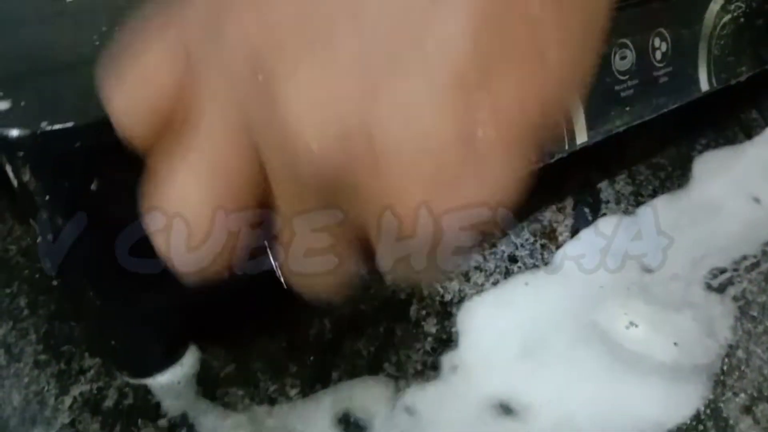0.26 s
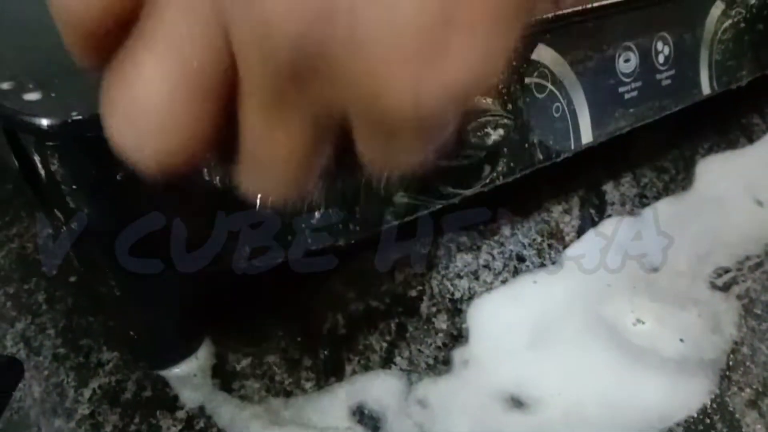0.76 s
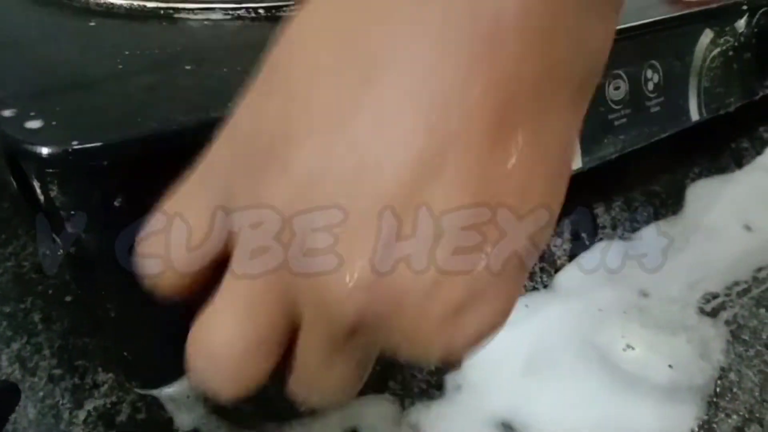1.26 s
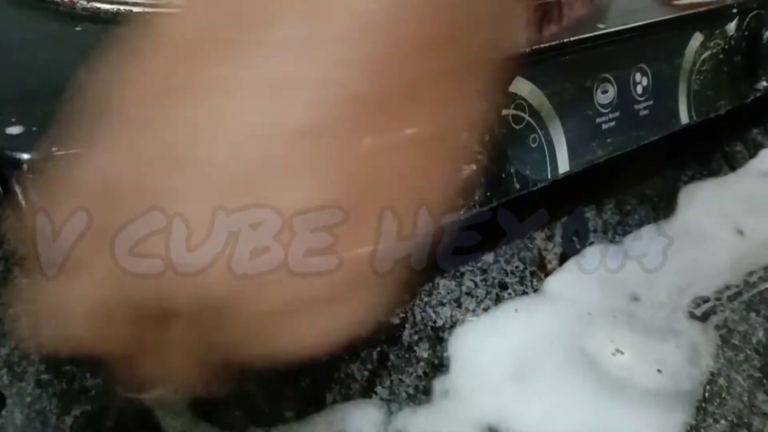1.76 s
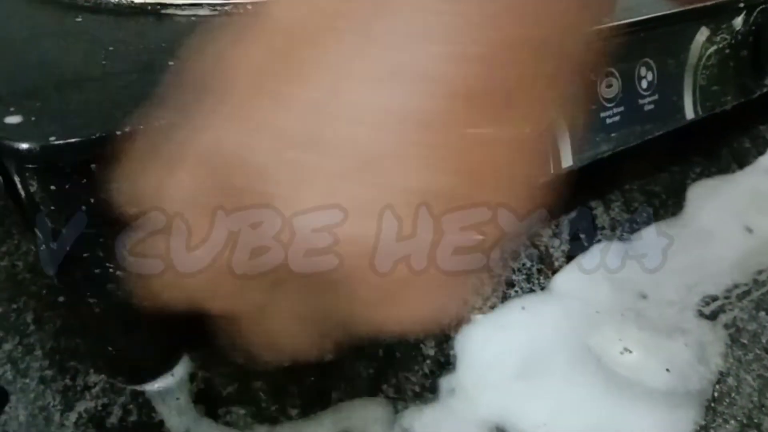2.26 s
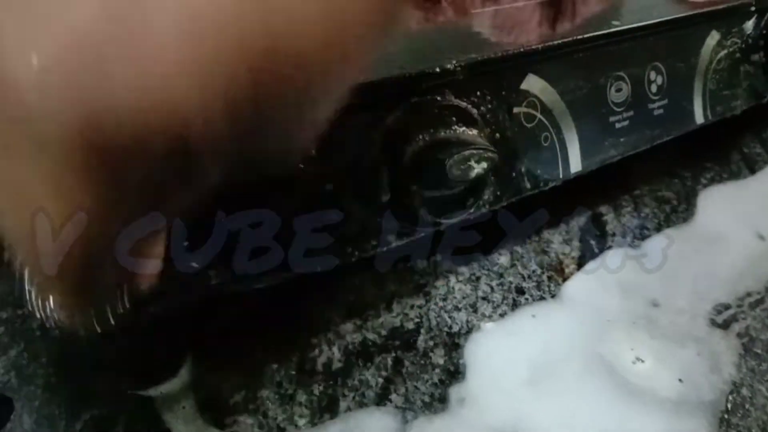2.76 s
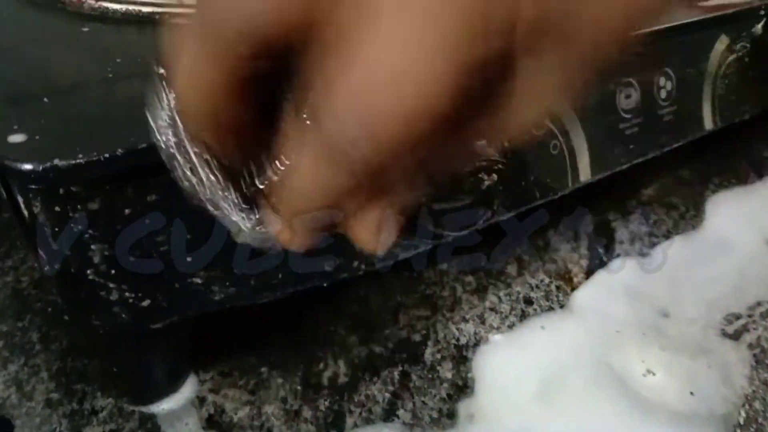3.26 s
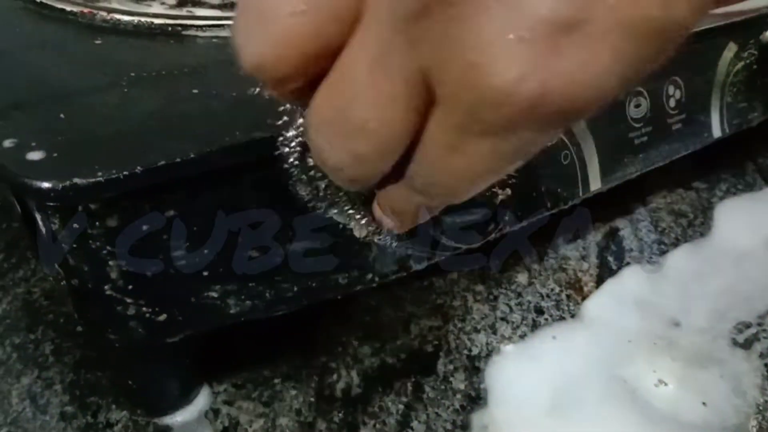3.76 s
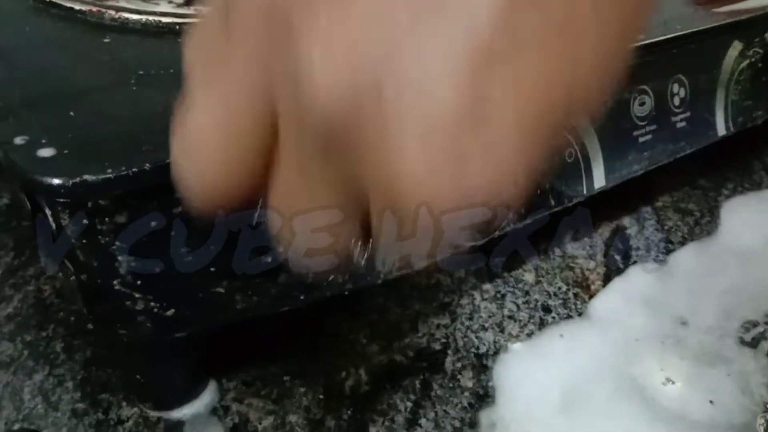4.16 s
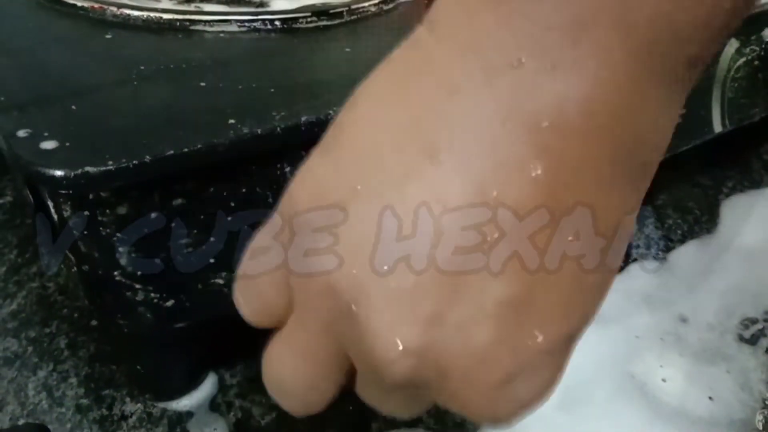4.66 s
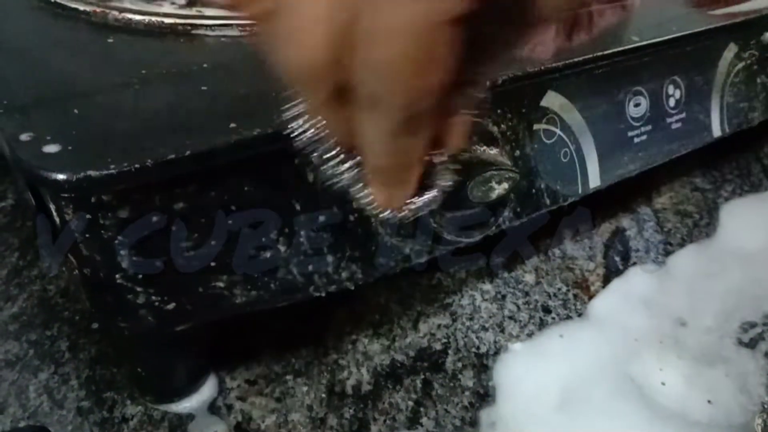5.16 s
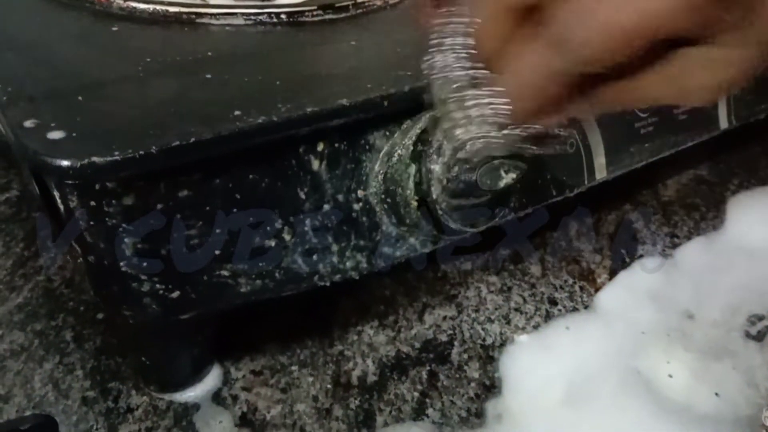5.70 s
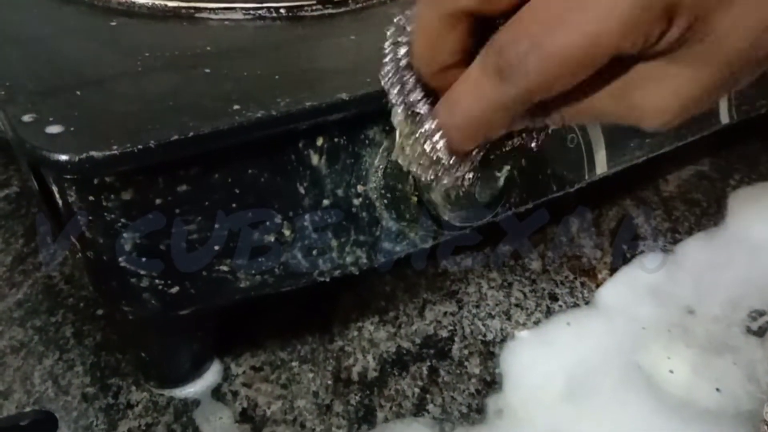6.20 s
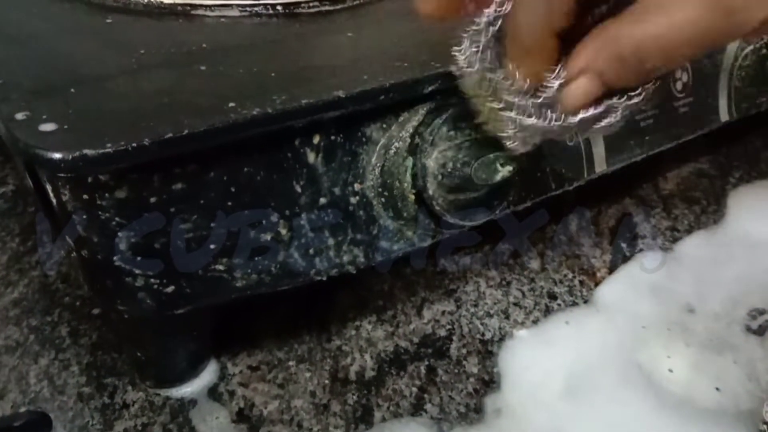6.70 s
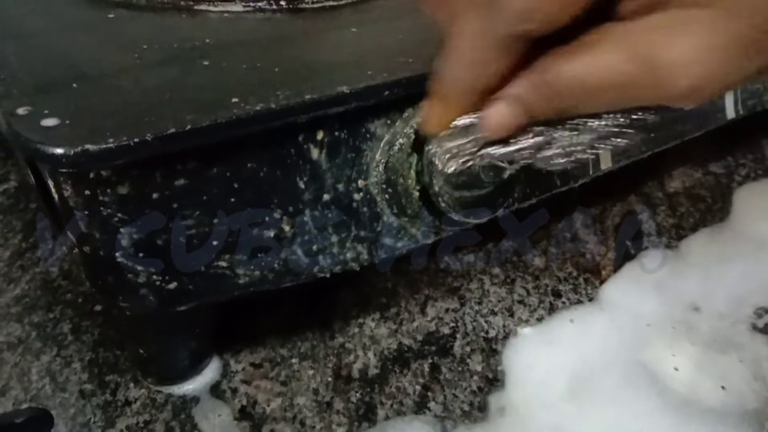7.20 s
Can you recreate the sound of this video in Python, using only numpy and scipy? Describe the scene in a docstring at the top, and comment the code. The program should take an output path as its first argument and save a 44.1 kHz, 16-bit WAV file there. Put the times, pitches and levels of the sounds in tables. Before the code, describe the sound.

A steel wool pad scrubs the front of a gas stove in quick, uneven strokes, a bright, wiry hiss with faint ringing from the sheet metal. The hand knocks the hollow knob a few times early on. The scrubbing pauses briefly and resumes, and later the knob snaps with one hard click, followed by lighter knocks and more strokes. The microphone is close, in a small, quiet kitchen.

```python
"""Steel wool on a gas stove

A steel wool pad scrubs to and fro over the front of a stove, close to a mono phone in a small kitchen.
By stick-slip friction, thousands of wires hiss and ring the sheet panel, its trim, the dial rim and the
hollow knob. The hand knocks these parts and the knob snaps once; the stove body thrums under pressure,
and the room reverberates over a faint noise floor."""
import sys
import numpy as np
from scipy import signal
from scipy.fft import rfft, irfft
from scipy.io import wavfile
from scipy.ndimage import uniform_filter1d

SR = 44100
rng = np.random.default_rng(int(sys.argv[2]) if len(sys.argv) > 2 else 0)


def output_pcm(signal):
    """Save a mono or channel-first signal as 16-bit PCM at the path in sys.argv[1].

    Samples are clipped to [-1, 1] before scaling.
    """
    pcm = np.clip(np.atleast_2d(signal).T, -1, 1) * 32767
    wavfile.write(sys.argv[1], SR, np.round(pcm).astype(np.int16))


N = 328104


def undb(db):
    """Amplitude ratio of a level in dB."""
    return 10 ** (np.asarray(db) / 20)


def unit(x):
    """Normalisation to rms 1."""
    return x / np.sqrt(np.mean(x ** 2))


def walk(per_s):
    """Slow random modulation: held random levels, smoothed twice, at rms 1."""
    hold = int(SR / per_s)
    steps = np.repeat(rng.standard_normal(N // hold + 1), hold)
    return unit(uniform_filter1d(uniform_filter1d(steps, hold), hold)[:N])


def butter(x, hz, kind, order=4):
    """Butterworth low- or high-pass filter."""
    return signal.sosfilt(signal.butter(order, hz, kind, fs=SR, output="sos"), x)


def colour(x, points, size=1024):
    """Minimum-phase filter through (Hz, dB) points, made by folding the cepstrum."""
    hz, db = np.transpose(points)
    gain = undb(np.interp(np.log(np.linspace(1, SR / 2, size + 1)), np.log(hz), db))
    cepstrum = irfft(np.log(gain))
    cepstrum[1:size] *= 2
    cepstrum[size + 1:] = 0
    return signal.oaconvolve(x, irfft(np.exp(rfft(cepstrum))))[:N]


def ring(x, modes, wander_db=0., damping=1.):
    """Modal superposition at about unit noise gain; a moving contact favours one mode, then another."""
    out, power = 0, 0
    for k, (hz, width, db) in enumerate(modes):
        drive = x * undb(wander_db * (walk(10) + .5 * walk(35))) if wander_db else x
        peak = signal.iirpeak(hz, hz / width / damping / 0.96, SR)
        out = out + (-1) ** k * undb(db) * signal.lfilter(*peak, signal.lfilter(*peak, drive))
        power += undb(db) ** 2 * np.pi * .75 * width * damping / SR
    return out / np.sqrt(power)


def at(table, place):
    """Linear interpolation between the rows of a table of places."""
    return np.array([np.interp(place, np.arange(len(table)), column) for column in np.transpose(table)])


def effort(hiss_gain, span_s=0.29):
    """A moving average of the hiss gain tells how hard the hand is at work."""
    half = int(span_s * SR / 2)
    return np.abs(uniform_filter1d(uniform_filter1d(hiss_gain, half), half))


# The kitchen's background spectrum. Each row: frequency in Hz, relative density in dB.
FLOOR_SPECTRUM = [(18, -46), (30, -18), (119, -18.5), (286, 0.5), (439, -10), (1620, -16.5), (1970, -15),
                  (4870, -44.5), (7640, -13), (12000, -53.5), (15600, -84.5), (22000, -120)]


def noise_floor(level_db=-70):
    """Ambient noise: a faint coloured hiss whose level wavers."""
    return unit(colour(rng.standard_normal(N), FLOOR_SPECTRUM)) * undb(level_db + 2.0 * walk(2.7))


def room(x, t60_s=0.46, gate_s=0.18):
    """Reflections off the counter, then a dull room tail, cut short as if by the phone's noise gate."""
    t = np.arange(SR // 2) / SR
    early = 0.3 * np.exp(-t / 0.0061)
    late = undb(-60 * t / t60_s)
    gate = 1 / (1 + (t / gate_s) ** 8)
    response = rng.standard_normal(len(t)) * (early + late * gate) * (t > .002)
    response /= np.sqrt(np.sum(response ** 2))
    return butter(signal.oaconvolve(x, response)[:N], 5950, "low", order=2)


# Low modes of the stove. Each row: frequency in Hz, nominal width in Hz, relative level in dB.
BODY_MODES = [(180, 44, 0)]
RUMBLE_MODES = [(42, 30, -13), (72, 27, -4.5), (110, 130, -4.5)]
# The hand leans on the stove. Each row: time of the peak in seconds, body level in dB, rumble level in dB.
LEANS = [(.21, -54, -65), (.62, -56.5, -63), (.95, -85, -64), (1.37, -52.5, -67), (1.48, -57, -79),
         (1.64, -69, -87), (1.95, -72, -77), (2.399, -54.5, -68.5), (3.11, -65.5, -76.5),
         (3.34, -62.5, -68.5), (3.6, -55.5, -69), (3.8, -49.5, -67.5), (3.96, -52.5, -68.5),
         (4.25, -60.5, -61.5), (4.6, -66, -74.5), (5.3, -61, -77.5), (5.5, -66, -59.5), (5.6, -51.5, -69),
         (6.03, -55, -62.5), (6.13, -47, -60.5), (6.73, -53.5, -79.5), (6.92, -52.5, -72),
         (7.15, -53.5, -70), (7.23, -79, -72), (7.36, -76, -78)]


def thrum(hiss_gain):
    """Forced vibration: scrubbing shakes the stove's low modes, and each lean of the hand swells them."""
    rise_db_per_s, fall_db_per_s = (208.5, 141), (226, 150)  # each pair: body, rumble
    rest_db, shake_db = (-85.5, -93), (-34, -40.5)
    t = np.arange(0, N, 64) / SR
    peak_s, *peaks_db = np.transpose(LEANS)[:, :, None]
    out, work = 0, effort(hiss_gain)
    for k, modes in enumerate((BODY_MODES, RUMBLE_MODES)):
        drop_db = np.maximum(rise_db_per_s[k] * (peak_s - t), fall_db_per_s[k] * (t - peak_s))
        lean = undb(peaks_db[k] - drop_db).sum(axis=0)
        gain = np.interp(np.arange(N) / SR, t, lean) + undb(rest_db[k]) + undb(shake_db[k]) * work
        out = out + ring(rng.standard_normal(N) * gain, modes)
    return out


# Strands that spring free. Each row: start in seconds, level in dB, nominal pitch in Hz.
TWANGS = [(0.2133, -19.5, 5990), (0.221, -26.5, 7900), (0.237, -26, 7510), (0.482, -40, 6600),
          (0.585, -34, 6550), (0.597, -33.5, 6300), (0.846, -37, 7900), (1.705, -30.5, 6000),
          (1.4296, -25, 6450), (1.733, -27, 7300), (1.926, -19.5, 5850), (2.005, -31, 7700),
          (2.145, -41, 6380), (5.323, -28, 7250), (5.422, -23, 5290), (6.881, -37, 6770)]


def twangs():
    """Free vibration: a caught strand lets go with a few milliseconds of rough, rising squeak."""
    out, t = np.zeros(N + SR), np.arange(SR // 50) / SR
    envelope = t / 0.0014 * np.exp(1 - t / 0.0013)
    for start, level_db, hz in TWANGS:
        rough = 1 + .5 * uniform_filter1d(rng.standard_normal(len(t)), size=8) * np.sqrt(8)
        chirp = np.sin(2 * np.pi * hz * t * (.9 + 25 * t))
        i = int(start * SR)
        out[i:i + len(t)] += undb(level_db) * chirp * rough * envelope
    return out[:N]


# Modes of the snapping knob. Each row: frequency in Hz, nominal width in Hz, relative level in dB.
SNAP_MODES = [(262, 40, -8.5), (570, 440, -14), (1040, 510, -6), (1570, 780, -8.5), (2320, 420, -10.5),
              (3100, 1100, -5.5), (3774, 430, -3.5), (4030, 600, 2.5), (5680, 450, -15.5),
              (6880, 640, -11.5), (12700, 2700, -32)]


def snap(start_s=6.019, impulse_db=15.5):
    """Impulse response: the knob springs back with one hard, bright click."""
    impulse = np.zeros(N)
    impulse[int(start_s * SR)] = undb(impulse_db)
    return ring(impulse, SNAP_MODES)


# Modes of the sheet panel, its trim, the dial rim, the knob and the hollow behind it, knocked or scrubbed.
# Each row: frequency in Hz, nominal width in Hz, relative level in dB.
PANEL_MODES = [(1280, 77, -3), (1541, 130, -5), (1726, 260, -13), (1829, 41, -2), (1880, 240, -12),
               (2399.5, 136, -0.5), (2399, 78, 0), (2552, 54, -2.5)]
TRIM_MODES = [(2937, 116, 4), (2992, 116, -1.5), (3190, 290, -5)]
RIM_MODES = [(3537, 130, -3), (3810, 160, -1.5), (3900, 160, -5), (4060, 120, -1), (4100, 53, -0.5),
             (4331, 190, -1.5)]
KNOB_MODES = [(731.4, 8.3, -11.5), (878.3, 17, -0.5), (867.7, 63, -2.5), (934, 38, -2), (1001, 22, -7.5),
              (1060, 50, -5.5), (1300, 64, -6), (1672, 67, -6.5), (1120, 700, -18.5)]
HOLLOW_MODES = [(254, 33, -11.5), (350, 65, -13.5), (426, 30, -3), (494, 41, 0.5), (557, 130, -5.5),
                (618.4, 17, -2.5)]
# Spectrum of the wire hiss and of a knock's crack. Each row: frequency in Hz, gain in dB.
WIRE_SPECTRUM = [(1760, -24), (3000, -11), (3260, -10), (3940, -16.5), (4730, -2), (5880, 2), (8000, 5),
                 (8640, -5.5), (9400, -14.5), (11400, -15.5), (12400, -11.5), (14000, -7), (16000, -11.5)]
# Coupling of a knock at places 0 (dial rim), 1 (knob) and 2 (sheet).
# Each row: gains in dB for knob, panel with trim, rim, hollow and crack.
KNOCK_COUPLING = [(-16, -22.5, 4, -34, -24), (0.5, -9, -20.5, -9, -23), (-27, 2, -9, -31, -13)]
# Knocks of the hand. Each row: start in seconds, strength in dB, place, contact time constant in ms.
KNOCKS = [(0.214, -37, 1.95, 1.7), (0.339, -25, 1.8, 3.2), (0.482, -39, 1.9, 2.5), (0.783, -33, 0.057, 2.3),
          (1.337, 9.5, 0.98, 4), (1.413, -4.5, 1.32, 1.2), (1.653, 9, 1, 3), (1.927, 14, 1.03, 4.6),
          (2.128, -32, .02, 3), (2.306, -41, .02, 3), (3.556, -13, 2.2, 4.3), (3.673, -22, .02, 3),
          (5.114, -14, 2.1, 3.5), (5.306, -30, .3, 3), (5.42, 7.5, 1.22, 2.2), (5.68, -9.5, 1.8, 2.4),
          (5.755, -27.5, .05, 3), (5.955, -10.5, 0.14, 4.9), (6.572, -17, 0.044, 3.4),
          (6.683, -40, 0.58, 3.5), (6.737, -16, 0.017, 2.6), (6.82, -3.5, 1.39, 4.9),
          (6.881, -3, 0.36, 1.2), (6.975, -13, 0.46, 2), (7.138, -21.5, 0.74, 2.6), (7.198, -11, 0.26, 3.7)]


def knocks(grip_damping=3.08, hollow_fill_s=.03):
    """Impact excitation: a sharp touch and a short rattle crack and ring the parts, damped by the hand."""
    drive, t = np.zeros((5, N + SR)), np.arange(SR // 20) / SR
    for start, strength_db, place, contact_ms in KNOCKS:
        age = t * 1000 / contact_ms
        rattle = rng.standard_normal(len(t)) * (2.4 + age) * np.exp(-age)
        rattle[0] = 2.1  # the first sharp touch
        rattle /= np.sqrt(np.sum(rattle ** 2))
        i = int(start * SR)
        drive[:, i:i + len(t)] += rattle * undb(strength_db + at(KNOCK_COUPLING, place))[:, None]
    fill = int(hollow_fill_s * SR)  # the space behind the knob fills slowly
    smear = unit(rng.standard_normal(fill)) / np.sqrt(fill)
    drive[3] = np.roll(signal.oaconvolve(drive[3], smear)[:N + SR], fill // 4)
    *forces, crack = drive[:, :N]
    parts = (KNOB_MODES, PANEL_MODES + TRIM_MODES, RIM_MODES, HOLLOW_MODES)
    ringing = sum(ring(force, modes, damping=grip_damping) for force, modes in zip(forces, parts))
    return butter(ringing, 280, "high") + colour(crack, WIRE_SPECTRUM)


# Coupling of the pad at places 0 (bare sheet), 1 (beside the dial), 2 (trim), 3 (round the knob) and
# 4 (behind it). Each row: gains in dB relative to the hiss for panel, trim, rim, knob and hollow.
PAD_COUPLING = [(-18.5, -9, -16, -35.5, -42), (-10, -13, -4, -33, -36.5), (-6.5, -1.5, -3, -32.5, -30),
                (-12.5, -2.5, 3, -1, -27), (0.5, 1.5, 5, 0, -4)]
# Strokes of the pad. Each row: start in seconds, length in seconds, fastest moment as a fraction of the
# length, hiss level in dB, place, push on the sheet in dB.
STROKES = [(-0.007, 0.15, 0.35, -38, 0.036, -7.5), (0.135, 0.16, 0.53, -33, 0.14, -2),
           (0.279, 0.16, 0.5, -40, 0.045, 1.5), (0.446, 0.2, 0.47, -41, 0.22, 0),
           (0.607, 0.14, 0.48, -45.5, .02, 1), (0.757, 0.24, 0.34, -37, 0.23, 5),
           (0.936, 0.22, 0.69, -38.5, 1, -6.5), (1.185, 0.19, 0.95, -42, .6, -11),
           (1.351, 0.22, 0.48, -38, 0.88, -9), (1.541, 0.18, 0.29, -39.5, .9, -6.5),
           (1.674, 0.15, 0.42, -35, 0.53, 4), (1.778, 0.18, 0.82, -36.5, 0.54, 1.5),
           (1.932, 0.16, 0.77, -34.5, 0.92, -8), (2.101, 0.17, 0.36, -38, 0.86, 0),
           (2.266, 0.19, 0.28, -40.5, 1.3, 0), (2.917, 0.24, 0.72, -46.5, 2.47, -2.5),
           (3.092, 0.24, 0.8, -46, 2.15, -1), (3.315, 0.15, 0.57, -42, 2.1, .5),
           (3.46, 0.2, 0.41, -41.5, 2.3, 0), (3.601, 0.2, 0.69, -42, 2.05, -2.5),
           (3.769, 0.24, 0.35, -38.5, 1.61, 5), (3.976, 0.16, 0.45, -46, 1.8, -7.5),
           (4.094, 0.21, 0.61, -39, 1.7, 3.5), (4.296, 0.18, 0.49, -50, 2.3, -8),
           (4.443, 0.19, 0.39, -42.5, 2.23, -2), (4.604, 0.18, 0.67, -55, 1.2, 6),
           (4.9, 0.2, 0.77, -52.5, 2.94, -4), (5.081, 0.15, 0.61, -42.5, 3.65, 1),
           (5.222, 0.16, 0.9, -36, 3.26, -1.5), (5.401, 0.14, 0.17, -35.5, 3.83, 1),
           (5.537, 0.18, 0.63, -43.5, 3.06, 3.5), (5.717, 0.16, 0.37, -45, 2.8, -2.5),
           (5.885, 0.12, 0.86, -44.5, 2.78, 2), (6.356, 0.15, 0.4, -67.5, 2.6, -4.5),
           (6.471, 0.23, 0.61, -49, 2.86, 1.5), (6.647, 0.15, 0.44, -46, 3.95, -9.5),
           (6.779, 0.13, 0.88, -39.5, 2.82, 2), (6.949, 0.14, 0.23, -40, 2.94, -3),
           (7.116, 0.17, 0.59, -41, 2.9, 4), (7.262, 0.17, 0.33, -40, 3.42, -2)]


def stroke_gains(rustle_db=-12.5, held_db=-76):
    """Friction noise follows sliding speed: the gains of the hiss and five parts swell with each stroke."""
    gains, t = np.zeros((6, N)), np.arange(N) / SR
    push_share = np.array([0.99, .4, 0.057, 0.78, 0])
    for start, length, fastest, hiss_db, place, push_db in STROKES:
        progress = (t - start) / length
        sliding = np.flatnonzero((progress > 0) & (progress < 1))
        swell = np.sin(np.pi * np.interp(progress[sliding], [0, fastest, 1], [0, .5, 1])) ** 2.35
        parts_db = at(PAD_COUPLING, place) + push_db * push_share
        gains[:, sliding] += swell * undb(hiss_db + np.array([0, *parts_db]))[:, None]
    # The pad crumples between strokes, and faintly when only held.
    rustle = undb(rustle_db) * effort(gains[0]) + undb(held_db)
    return gains + rustle * undb([0, -14, -9, -7, -26, -28])[:, None]


def slips(per_s, catch, spread_db=2.77):
    """Shot noise: single wire slips of very uneven size, scaled by how hard the pad catches."""
    size_draw, sign_draw, time_draw = rng.random((3, N))
    size = undb(spread_db * np.minimum(-np.log(1 - size_draw), 6.0))
    return unit((time_draw < per_s / SR) * size * np.sign(sign_draw - .5) * catch)


def scrub(gains):
    """Stick-slip friction: bunches of wire slips radiate as hiss and drive the parts under the pad."""
    wire, panel, trim, rim, knob, hollow = gains
    catch = undb(1.73 * walk(70))
    hiss, fizz, force = (slips(per_s, catch * undb(1.9 * walk(40))) for per_s in (8000, 9000, 6000))
    # Wrapped round the dial, the pad loses the fizz of its finest strands.
    fizz = butter(fizz * (rim / wire) ** -.3 * undb(-0.5), 9340, "high")
    # The hiss of the coarser strands brightens and darkens as the pad rolls.
    roll = undb(2.0 * walk(12))
    dark = butter(hiss, 6700, "low") / roll
    bright = butter(butter(hiss, 6830, "high"), 9480, "low") * roll
    radiated = colour(wire * (dark + bright + fizz), WIRE_SPECTRUM)
    radiated /= np.std(colour(rng.standard_normal(N), WIRE_SPECTRUM))  # unit gain for white noise
    return (radiated + ring(force * panel, PANEL_MODES, wander_db=4.1)
            + ring(force * trim, TRIM_MODES, wander_db=1.8)
            + ring(force * rim, RIM_MODES, wander_db=1.9)
            + ring(force * knob, KNOB_MODES, wander_db=4.2)
            + ring(force * hollow, HOLLOW_MODES, wander_db=2.1))


def scene():
    """Superposition: all sources add at one microphone, so both channels are the same."""
    gains = stroke_gains()
    rub, hits, click = scrub(gains) + twangs(), knocks(), snap()
    reverb = undb(-3.5) * room(hits + undb(5.0) * click + undb(-18) * rub)
    mono = rub + hits + click + reverb + thrum(gains[0]) + noise_floor()
    return np.array([mono, mono])


def record(dry, port_hz=4960, top_hz=15800):
    """Transducer response: the microphone port has a dip; the phone clips and cuts the top."""
    notched = dry - 0.57 * signal.lfilter(*signal.iirpeak(port_hz, 6.0, SR), dry)
    low_pass = signal.ellip(12, .2, 90, top_hz, fs=SR, output="sos")
    return signal.sosfilt(low_pass, np.clip(notched, -1, 1))


dry = scene()
out = record(dry)
output_pcm(out)
```